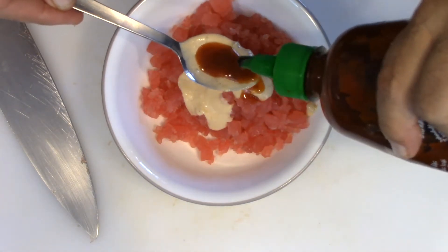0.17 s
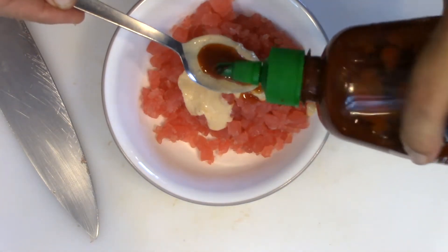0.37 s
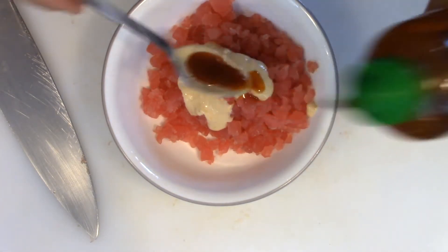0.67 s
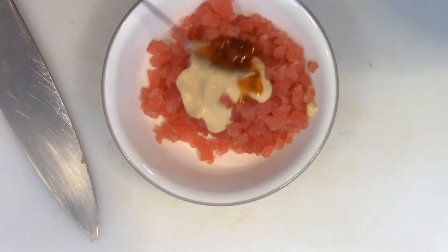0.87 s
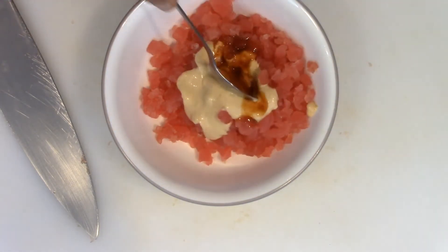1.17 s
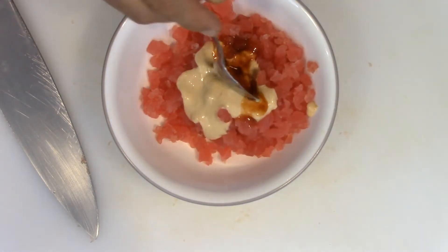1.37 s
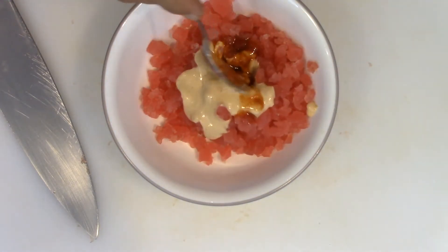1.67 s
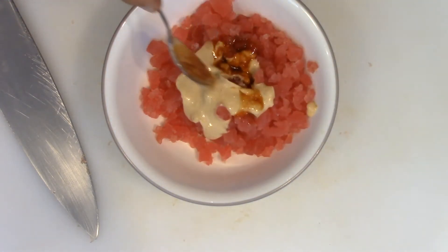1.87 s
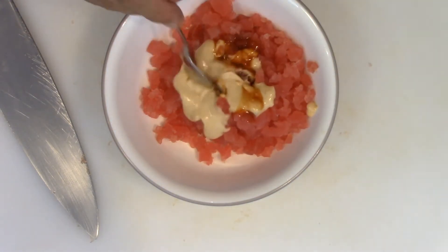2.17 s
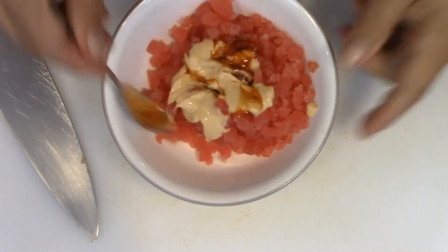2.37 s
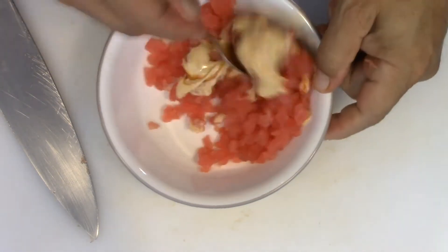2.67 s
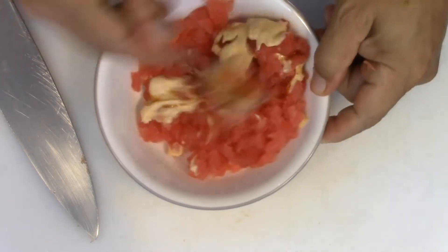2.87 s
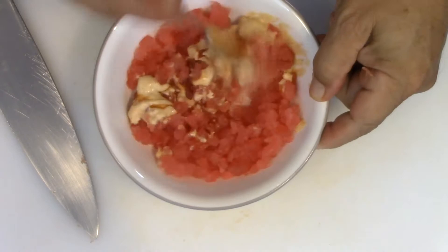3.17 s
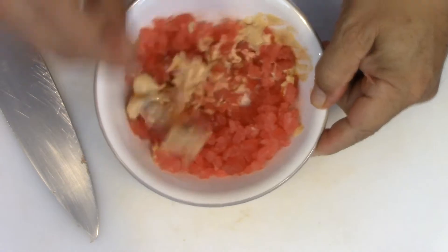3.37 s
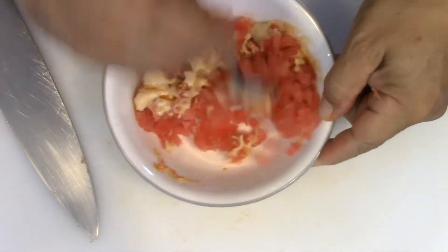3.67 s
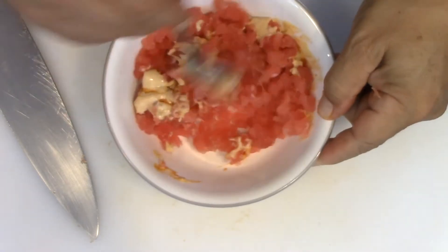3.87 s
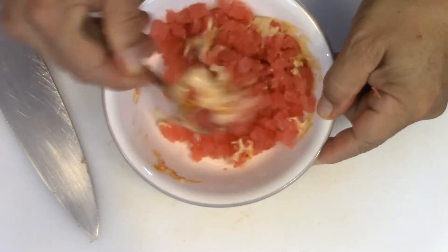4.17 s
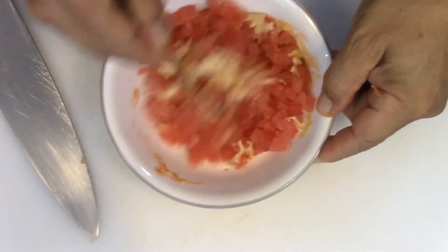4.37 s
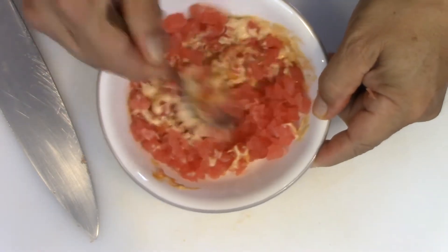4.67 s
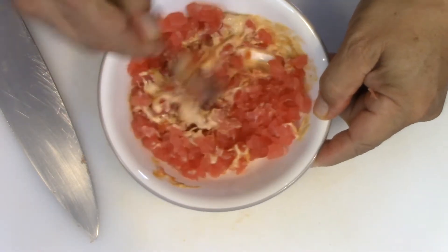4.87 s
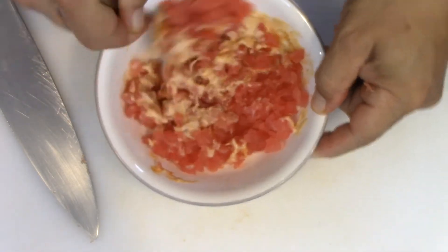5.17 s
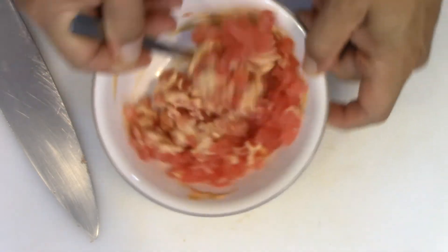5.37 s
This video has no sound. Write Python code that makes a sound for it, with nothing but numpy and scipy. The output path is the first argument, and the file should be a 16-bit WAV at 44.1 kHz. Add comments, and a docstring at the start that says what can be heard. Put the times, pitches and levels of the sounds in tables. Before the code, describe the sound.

Quiet, wet stirring is heard up close over the steady hum of a kitchen fan. A bottle knocks down on the counter, then a metal spoon starts clinking irregularly against a ceramic bowl, which bumps dully on a board. The sticky food hisses, crackles and smacks as it is folded more briskly. Each clink rings only briefly, followed by a short room echo.

```python
"""In an echoing kitchen, a metal spoon stirs diced fish and sauce in a ceramic bowl on a cutting board.
A fan hums throughout. The sticky mix hisses as it slides and crackles as air pockets pop and films of
sauce tear. A sauce bottle is set down, the bowl thuds on the board, and the spoon clinks against the
bowl's wall, whose ring the food cuts short. A limiter holds down the loudest clinks."""
import sys
import numpy as np
from scipy import signal
from scipy.fft import rfft, irfft
from scipy.io import wavfile
from scipy.ndimage import uniform_filter1d, minimum_filter1d

SR = 44100
rng = np.random.default_rng(int(sys.argv[2]) if len(sys.argv) > 2 else 0)


def digitize_waveform(pressure):
    """Quantize a signal to 16-bit integers and store it at the path in sys.argv[1].

    Rows of a 2-D input are taken as channels; values are limited to [-1, 1].
    """
    field = np.atleast_2d(pressure).T
    bounded = np.clip(field, -1, 1)
    quanta = np.round(bounded * 32767).astype(np.int16)
    wavfile.write(sys.argv[1], SR, quanta)


N = 243873

# the fan's rush of air, from bass to treble: f/Hz, level/dB
FAN_SPECTRUM = [(18, -53), (30, -38), (48, -22), (70, -13), (86, -38), (149, -11.5), (221, -6), (239, -7.5),
                (273, -5), (336, -9.5), (384, -6), (526, -10), (822, -16.5), (3140, -30), (16000, -47.5)]
# the fan motor's tones: f/Hz, level/dB
MOTOR_TONES = [(59.2, -74.5), (247.6, -61), (296.1, -59.5), (333.8, -53.5)]
# how hard the stirring is; sauce is tipped off the spoon, then the mix is folded: t/s, level/dB
STIR_EFFORT = [(0, -15), (.55, -23), (.9, -9.5), (1.5, -15), (2.6, -2), (4.1, -4), (4.5, 0.5), (5.05, 0),
               (5.35, -12.5), (5.53, 3.5)]
# the hiss of food sliding along the bowl: f/Hz, level/dB
SLIDE_SPECTRUM = [(500, 14), (1200, -5), (2400, 8), (4300, 5), (6000, -11), (10000, -6), (16000, -26)]
# the clearest sticky smacks: t/s, level/dB, f/Hz
SAUCE_SMACKS = [(.826, -48, 3800), (1.281, -46, 6200), (1.866, -37.5, 2580), (4.1943, -35.5, 2580),
                (4.2264, -35, 2230), (4.27, -35.5, 2850), (4.424, -33, 2920), (4.5017, -34, 8850),
                (5.0, -34.5, 1900), (5.138, -39, 3400), (5.2838, -28.5, 7860), (5.503, -35, 2500)]
# the bottle touching down: t/s, level/dB, treble cutoff f/Hz
BOTTLE_TAPS = [(1.6317, 12.2, 4800), (1.6379, 16.8, 705), (1.6561, 9.6, 2008.5)]
# the bottle's modes (tones it rings at; a narrower one rings longer): f/Hz, width/Hz, level/dB
BOTTLE_MODES = [(101.7, 17, 9), (159, 39, -1), (265, 89, -7.5), (508, 75, 0.5), (627, 43, 4),
                (810, 20, -22), (1220, 220, -5.5), (1930, 73, 0), (1980, 55, 0.5), (3300, 1600, -11),
                (6500, 2200, -17)]
# bowl and hands bumping the board: t/s, level/dB, f/Hz
BOARD_BUMPS = [(1.8807, 28.5, 346), (2.2232, 32, 400), (2.2361, 39.5, 270), (3.005, 17, 342),
               (3.0205, 35, 241.6)]
# the modes of board and counter: f/Hz, width/Hz, level/dB
BOARD_MODES = [(106, 14, -9.5), (149.4, 13, -19), (271, 23, -31), (373, 19, -9), (454, 74, -6.5),
               (604, 72, -7)]
# spoon hits; each favours two pitches of the bowl and one range of the spoon's ring:
# t/s, force level/dB, main f/Hz, second f/Hz, main boost/dB, treble level/dB (0 on clean glaze),
# spoon f/Hz, spoon level/dB, level sent to the room/dB
SPOON_HITS = [(2.061, 26, 1990, 2580, 13.5, 2.5, 11300, -6, -0.5),
              (2.2273, 23.5, 1600, 2750, 9.5, -23, 4470, -5.5, 3),
              (2.3316, 17.5, 2140, 3300, 11.5, -3.5, 7900, -3, -4.5),
              (2.6066, 23.5, 2240, 4260, 10.5, -2.5, 6400, 5, -3),
              (2.8947, 23, 2240, 4200, 13.5, -5.5, 3600, -10, -4),
              (3.0122, 20.5, 3170, 1600, 5, -21.5, 3920, -22, 2.5),
              (3.1171, 28.5, 2700, 1860, 7.5, -6, 10400, -1.5, 0),
              (3.3915, 18, 3370, 2240, 9, -3.5, 4700, 5.5, -4),
              (3.651, 23.5, 2450, 3340, 12.5, -2.5, 6900, -9, 1.5),
              (3.9164, 20, 3500, 2320, 8.5, 0, 4140, 1.5, -5.5),
              (4.4557, 0, 1900, 2420, 9, -15, 4400, -17, -2.5),
              (4.6614, 25.5, 3290, 2260, 6, -19, 6340, -19.5, -5),
              (5.0355, -4.5, 3340, 2500, 10.5, -3.5, 4570, -6.5, 3.5)]
# pitches that arrive late as bending waves travel through the bowl: f/Hz, width/Hz
LATE_BANDS = [(1400, 430), (2700, 650), (3700, 5800), (6000, 850), (9500, 540)]
# the bowl's modes, damped by food except for two lingering tones: f/Hz, width/Hz, level/dB
BOWL_MODES = [(600, 88, -7.5), (822, 540, -11.5), (1410, 139, -6.5), (2037, 600, -6), (2320, 130, -8),
              (2750, 600, -9), (3166, 350, -3.5), (3650, 610, -4), (4440, 500, -10), (5470, 1000, -9.5),
              (6340, 360, -15), (7490, 690, -14.5), (8830, 1400, -15.5), (10390, 420, -9.5),
              (12800, 1000, -17), (1386, 4.4, -4), (2325, 1.94, -8)]
# the modes of the spoon's thin ring: f/Hz, width/Hz, level/dB
SPOON_MODES = [(3300, 10, 7), (4280, 3.6, 2.5), (4560, 24, 0), (4730, 6, 1), (4834, 14, -1),
               (4920, 58, -0.5), (5835, 10.6, -6), (6360, 22, -6), (10330, 150, -1), (10140, 98, -8.5),
               (10760, 120, -17)]
# how strong the kitchen's echo is: f/Hz, level/dB
ECHO_LEVELS = [(80, -10.5), (150, -2.5), (300, -4.5), (600, -1), (950, 3), (1400, -4.5), (3000, -9),
               (8000, -5.5), (15000, -15)]
# how long the echo takes to fade by 60 dB: f/Hz, t/s
ECHO_TIMES = [(80, 0.38), (300, 0.46), (600, 0.52), (1400, 0.84), (3000, 0.53), (5000, 0.96), (10000, 0.39),
              (15000, 0.43)]
# the echo's stereo width, as the unshared part against the shared part: f/Hz, level/dB
ECHO_WIDTHS = [(120, -28), (500, -27), (1500, -21), (4000, -12), (10000, -16)]
# stereo balance, left minus right: f/Hz, level/dB
BALANCE = [(60, -0.5), (400, -1.67), (1400, -2.4), (4000, -1), (10000, 0.3)]


def from_db(db):
    """Turn decibels into a number to multiply by."""
    return 10 ** (np.asarray(db) / 20)


def at_hz(table, hz):
    """Read between a table's rows, with octaves evenly spaced."""
    freqs, values = np.transpose(table)
    return np.interp(np.log(np.maximum(hz, 1)), np.log(freqs), values)


def add(track, start_s, sound):
    """Mix a sound into the track at the given time."""
    i = int(start_s * SR)
    track[i:i + len(sound)] += sound[:N - i]


def blow(db):
    """One sharp push followed by a quarter second of rest."""
    return from_db(db) * signal.unit_impulse(SR // 4) + 1e-18


def resonate(x, hz, width_hz):
    """Let the sound ring at one pitch and weaken the pitches away from it."""
    decay = np.exp(-np.pi * width_hz / SR)
    angle = 2 * np.pi * min(hz, .45 * SR) / SR
    gain = (1 - decay ** 2) / 2
    return signal.lfilter([gain, 0, -gain], [1, -2 * decay * np.cos(angle), decay ** 2], x)


def ring(x, modes):
    """An object rings in all its modes at once, a little differently each time."""
    shares = from_db(rng.normal(0, 1, len(modes)))
    return sum(share * from_db(db) * resonate(x, hz, width)
               for share, (hz, width, db) in zip(shares, modes))


def cut_treble(x, hz, order=2):
    """Weaken everything above hz, as a soft contact does."""
    return signal.sosfilt(signal.butter(order, min(hz, .45 * SR), fs=SR, output="sos"), x)


def cut_bass(x, hz, order=3):
    """Weaken everything below hz: small things give off little bass."""
    return signal.sosfilt(signal.butter(order, min(hz, .45 * SR), "high", fs=SR, output="sos"), x)


def shape_noise(noise, spectrum):
    """Give noise its tone colour, then set its average power to 1."""
    freqs = np.arange(N // 2 + 1) * SR / N
    shaped = irfft(rfft(noise) * from_db(at_hz(spectrum, freqs)), N)
    return shaped / np.sqrt(np.mean(shaped ** 2) + 1e-20)


def stereo_noise(size, side_db=-19):
    """White noise that is nearly alike on the left and right."""
    mid, side = rng.standard_normal((2, size))
    return mid + from_db(side_db) * side * np.array([[1], [-1]])


def fan(air_db=-50.5, motor_trim_db=-2):
    """A steady rush of air with a few faint motor tones."""
    t = np.arange(N) / SR
    hum = sum(from_db(db) * np.sqrt(2) * np.sin(2 * np.pi * (hz * t + rng.random()))
              for hz, db in MOTOR_TONES)
    air = shape_noise(stereo_noise(N), FAN_SPECTRUM)
    return from_db(air_db) * air + from_db(motor_trim_db) * hum


def stirring(pops_per_s=340, pop_db=-51.5, pop_s=0.00091, slide_db=-60, bands=8):
    """Air pockets pop over the hiss of sliding food; harder stirring brings more of both."""
    t = np.arange(N) / SR
    effort_db = np.interp(t, *np.transpose(STIR_EFFORT))
    # the food sticks and gives way about 25 times a second, so the pops come in clumps
    slip_times = np.arange(0, N / SR + 1, 1 / 25)
    slip = np.interp(t, slip_times, rng.standard_normal(len(slip_times)))
    popped = rng.random(N) < pops_per_s * from_db(effort_db + 4 * slip) / SR
    size_db = 5.5 * np.minimum(rng.exponential(1, N), 3)
    pops = popped * from_db(pop_db + 0.67 * effort_db + size_db)
    pop_band = rng.integers(0, bands, N)
    noise = rng.standard_normal(N)
    hiss = shape_noise(rng.standard_normal(N), SLIDE_SPECTRUM)
    out = from_db(slide_db + 0.51 * effort_db + 3.6 * slip) * hiss
    for band, hz in enumerate(np.linspace(3800, 11000, bands)):
        fades = signal.lfilter([1], [1, -np.exp(-1 / (pop_s * SR))], pops * (pop_band == band) + 1e-18)
        width_hz = 0.56 * hz
        out += resonate(resonate(noise * fades, hz, width_hz), hz, width_hz)
    return out


def smacks(rise_s=0.00083):
    """A film of sauce tears in a tiny burst of snaps."""
    out = np.zeros(N)
    t = np.arange(SR // 20) / SR
    for start_s, db, hz in SAUCE_SMACKS:
        burst = rng.standard_normal(len(t)) * t * np.exp(-t / rise_s)
        width_hz = 0.65 * hz
        snap = resonate(resonate(burst, hz, width_hz), hz, width_hz)
        add(out, start_s, from_db(db) * snap / np.abs(snap).max())
    return out


def bottle():
    """The bottle lands on its edge and rocks flat."""
    out = np.zeros(N)
    for start_s, db, cutoff_hz in BOTTLE_TAPS:
        push = cut_treble(blow(db), cutoff_hz)
        add(out, start_s, ring(push, BOTTLE_MODES))
    return out


def thuds():
    """Soft, heavy bumps boom through the board; lower ones are duller and ring longer."""
    out = np.zeros(N)
    for start_s, db, hz in BOARD_BUMPS:
        push = cut_treble(blow(db), 1.52 * hz, order=3)
        boom = resonate(push, hz, width_hz=48 * (hz / 270) ** 2)
        add(out, start_s, cut_bass(boom, hz=144) + ring(push, BOARD_MODES))
    return out


def bending_waves(x):
    """The bowl's wall carries some pitches later than others, spreading a blow out in time."""
    for hz, width_hz in LATE_BANDS:
        x = x - 2 * resonate(x, hz, width_hz)
    return x


def clinks(skid_s=0.0012, skid_hz=3800, skid_db=-2, sauce_hz=3240):
    """Each hit rings both bowl and spoon; returns the direct sound and the sound sent to the room."""
    direct, to_room = np.zeros((2, N))
    t = np.arange(SR // 4) / SR
    for (start_s, force_db, main_hz, second_hz, boost_db, treble_db,
         spoon_hz, spoon_db, room_db) in SPOON_HITS:
        # steel skids on the glaze for an instant, which roughens the treble
        skid = rng.standard_normal(len(t)) * np.exp(-t / skid_s)
        skid = from_db(force_db + skid_db) * cut_bass(skid / np.linalg.norm(skid), skid_hz)
        rough = cut_treble(blow(force_db), 2 * skid_hz, order=1) + skid
        # the direct sound is rough; the room gathers all directions, so it gets an even blow
        pushes = np.array([rough, blow(force_db)])
        pushes = bending_waves(cut_treble(pushes, hz=13500, order=3))
        bowl = cut_bass(ring(pushes, BOWL_MODES), hz=220)
        # the struck spot brings out two pitches
        for hz, db in (main_hz, boost_db), (second_hz, 0.79 * boost_db):
            bowl = bowl + (from_db(db) - 1) * resonate(bowl, hz, width_hz=280)
        # sauce between spoon and glaze soaks up the treble
        treble = from_db(treble_db) * cut_bass(bowl, sauce_hz, order=5)
        bowl = cut_treble(bowl, sauce_hz, order=5) + treble
        spoon = resonate(ring(blow(force_db + spoon_db), SPOON_MODES), spoon_hz, width_hz=1200)
        add(direct, start_s, bowl[0] + spoon)
        add(to_room, start_s, from_db(room_db) * (bowl[1] + spoon))
    return direct, to_room


def kitchen_echo(x, first_s=0.0011, swell_db=4, swell_at_s=0.028, swell_width_s=0.041):
    """Echoes swell as they return from walls and ceiling, then each pitch range fades at its own pace."""
    t = np.arange(SR) / SR
    hump = np.exp(-((t - swell_at_s) / swell_width_s) ** 2)
    swell = (t > first_s) * from_db(swell_db * hump)
    edges_hz = np.geomspace(60, 17000, 17)
    echo = 0
    for low, high in zip(edges_hz, edges_hz[1:]):
        hz = np.sqrt(low * high)
        fade = swell * from_db(-60 * t / at_hz(ECHO_TIMES, hz))
        tail = stereo_noise(SR, at_hz(ECHO_WIDTHS, hz)) * fade
        band = signal.sosfilt(signal.butter(2, [low, high], "band", fs=SR, output="sos"), tail)
        echo = echo + from_db(at_hz(ECHO_LEVELS, hz)) * band / np.linalg.norm(fade)
    return signal.fftconvolve(x[None], echo, axes=1)[:, :N]


def scene():
    """The sounds on the counter, their echo and the fan; all but the high treble leans a little right."""
    direct_clinks, room_clinks = clinks()
    knocks_and_food = cut_bass(thuds() + bottle(), hz=90) + smacks() + stirring()
    mix = direct_clinks + knocks_and_food + kitchen_echo(room_clinks + knocks_and_food) + fan()
    freqs = np.arange(N // 2 + 1) * SR / N
    lean_db = at_hz(BALANCE, freqs) * np.array([[.5], [-.5]])
    return irfft(rfft(mix) * from_db(lean_db), N)


def record(dry, ceiling=0.88, treble_hz=14500, cutoff_hz=16300):
    """The microphone softens the treble, a fast limiter turns peaks down, and the very top is cut."""
    heard = cut_treble(dry, treble_hz)
    needed_gain = ceiling / np.maximum(np.abs(heard), ceiling)
    smooth_gain = uniform_filter1d(minimum_filter1d(needed_gain, size=23), size=23)
    top_cut = signal.ellip(10, .1, 80, cutoff_hz, fs=SR, output="sos")
    return signal.sosfilt(top_cut, heard * smooth_gain)


dry = scene()
out = record(dry)
digitize_waveform(out)
```